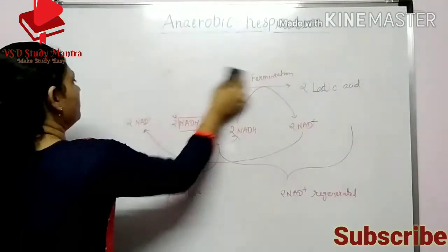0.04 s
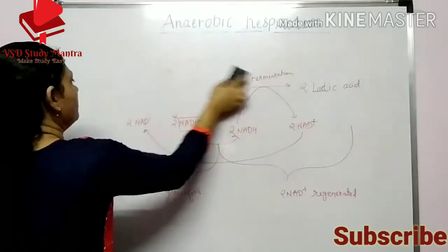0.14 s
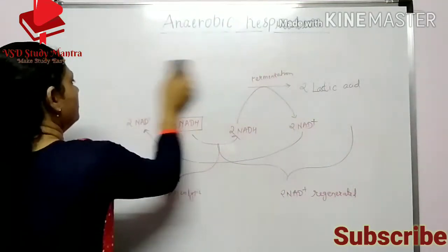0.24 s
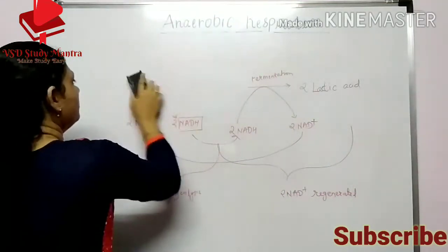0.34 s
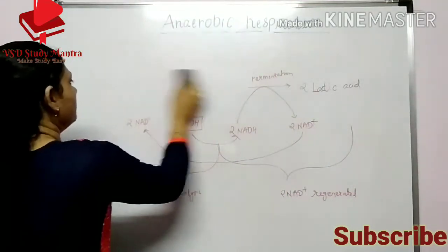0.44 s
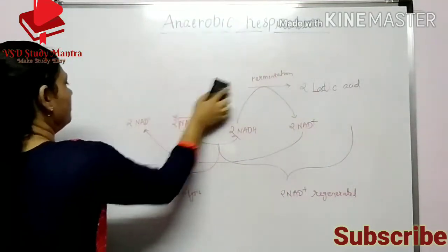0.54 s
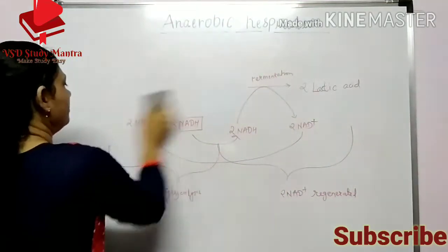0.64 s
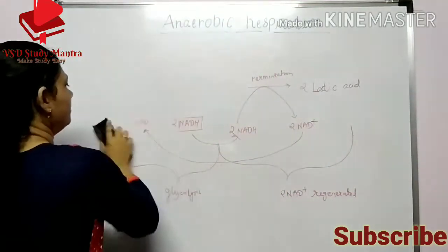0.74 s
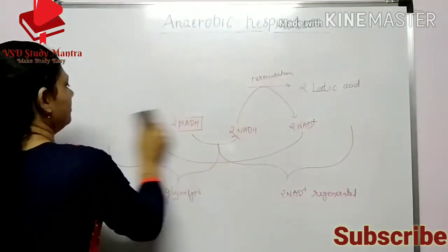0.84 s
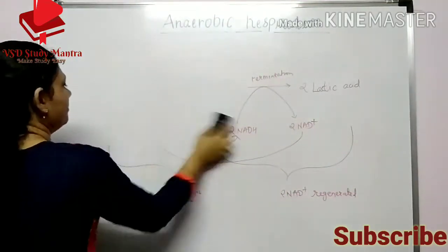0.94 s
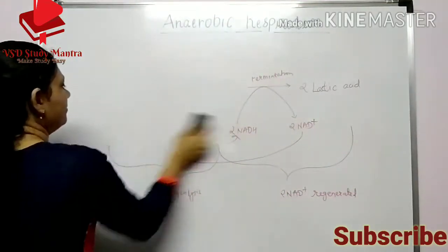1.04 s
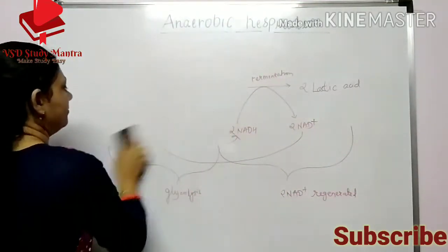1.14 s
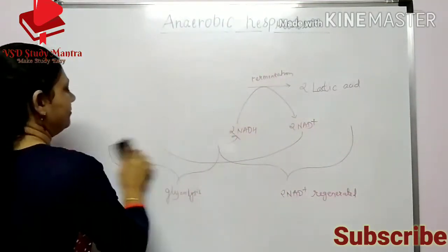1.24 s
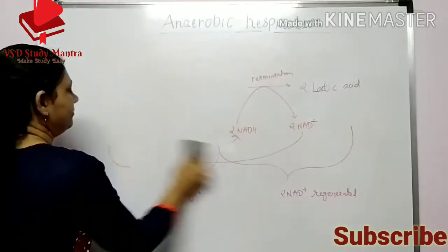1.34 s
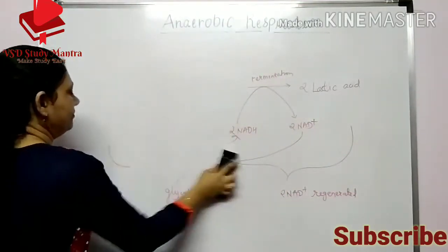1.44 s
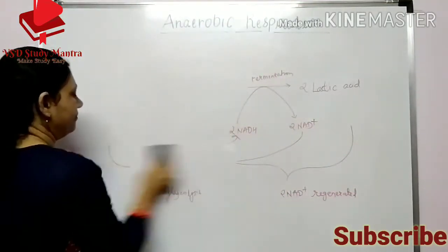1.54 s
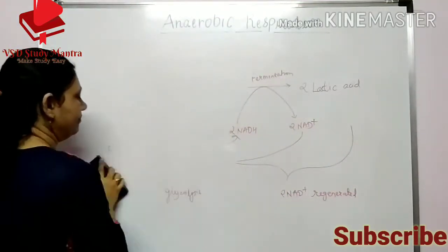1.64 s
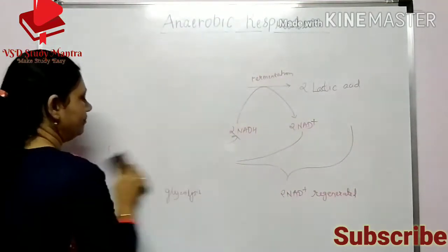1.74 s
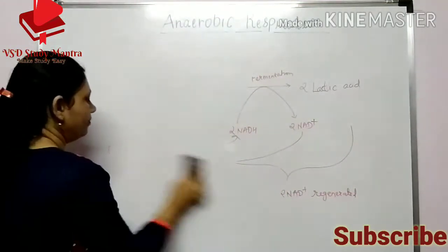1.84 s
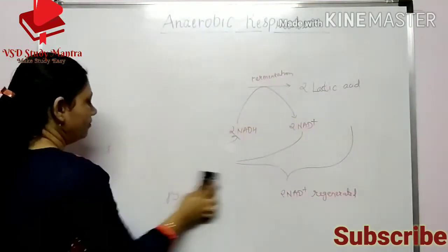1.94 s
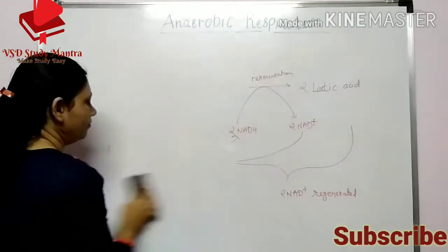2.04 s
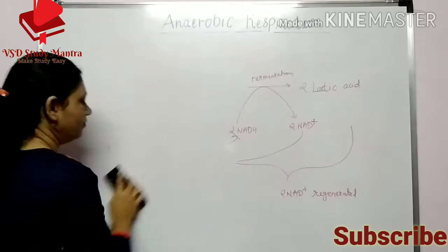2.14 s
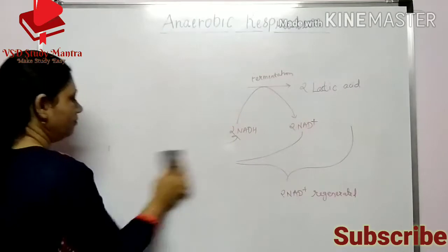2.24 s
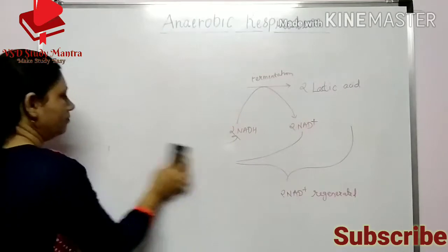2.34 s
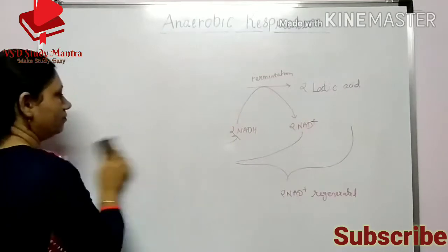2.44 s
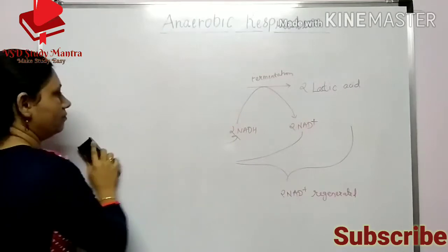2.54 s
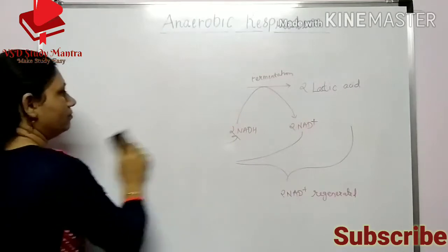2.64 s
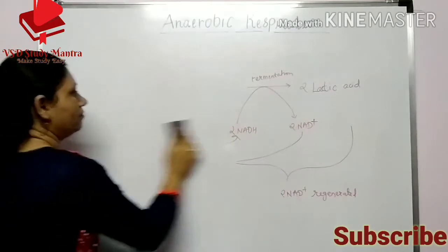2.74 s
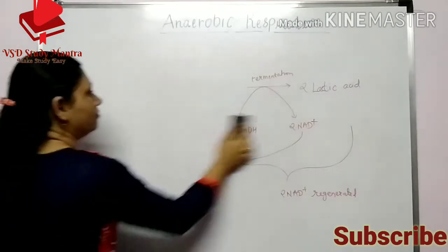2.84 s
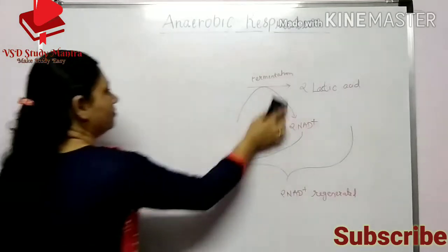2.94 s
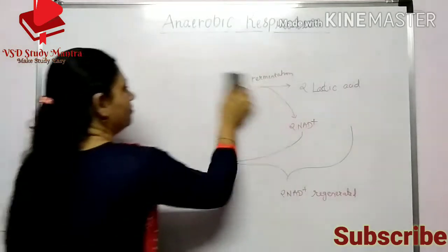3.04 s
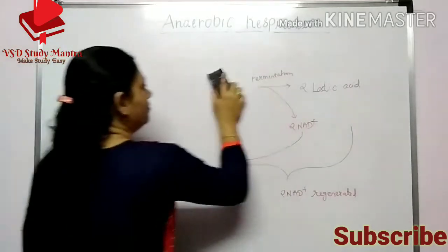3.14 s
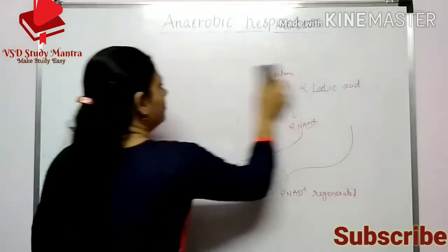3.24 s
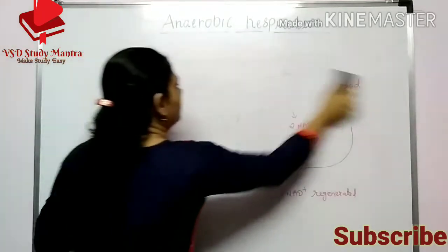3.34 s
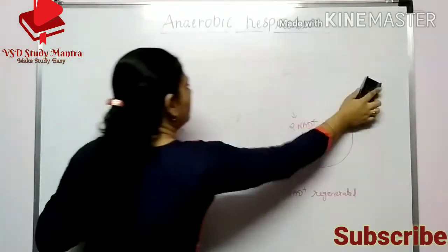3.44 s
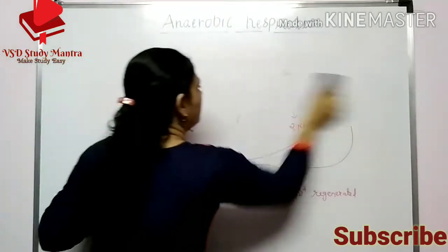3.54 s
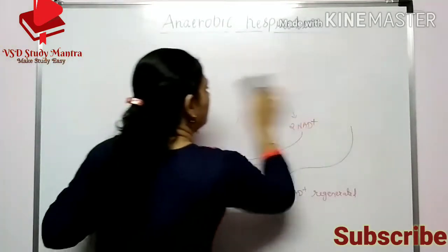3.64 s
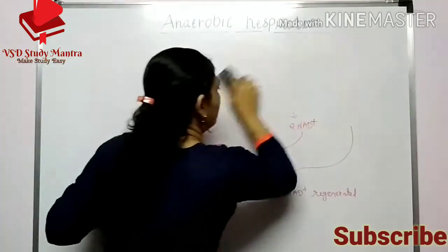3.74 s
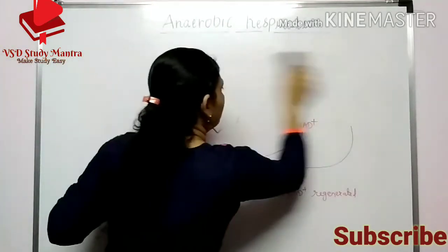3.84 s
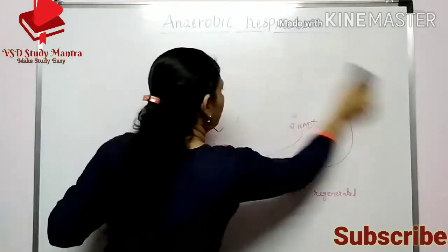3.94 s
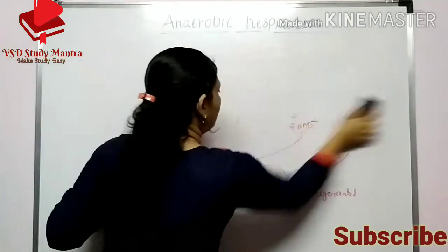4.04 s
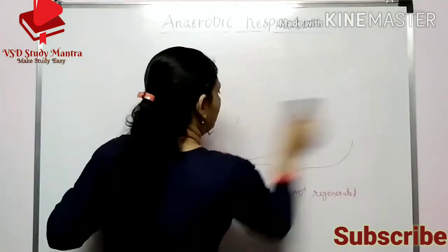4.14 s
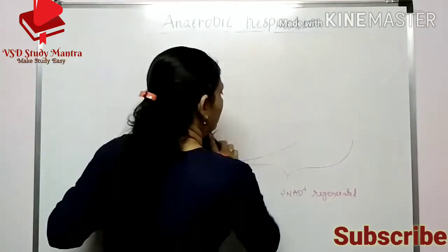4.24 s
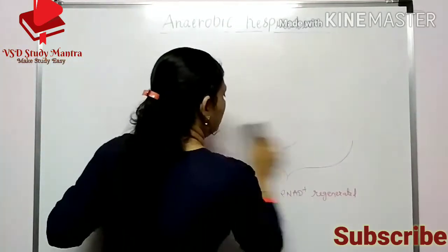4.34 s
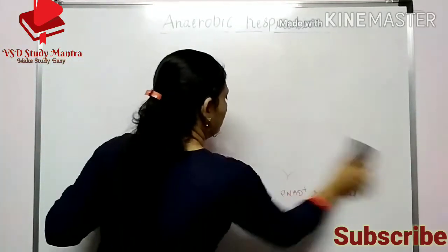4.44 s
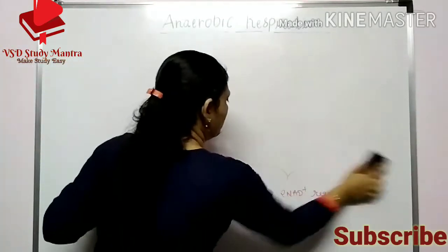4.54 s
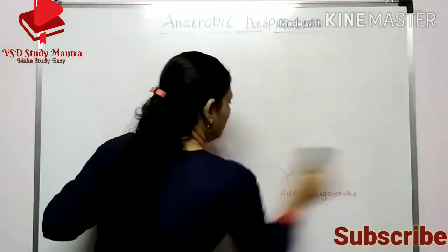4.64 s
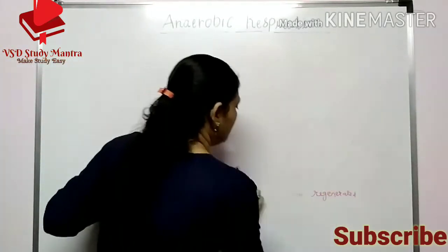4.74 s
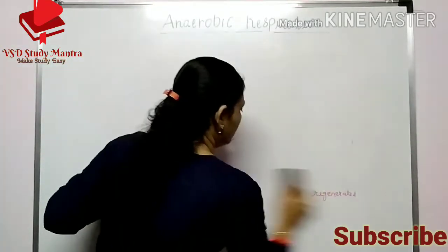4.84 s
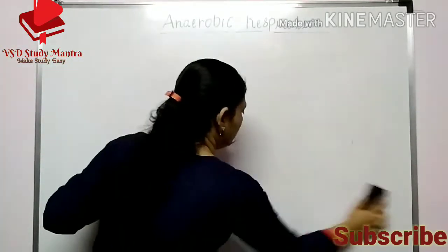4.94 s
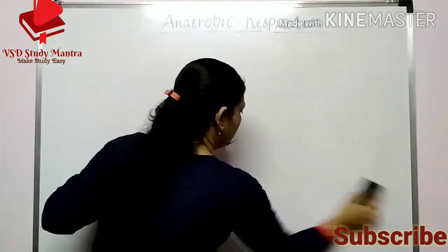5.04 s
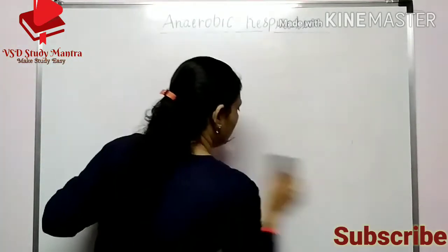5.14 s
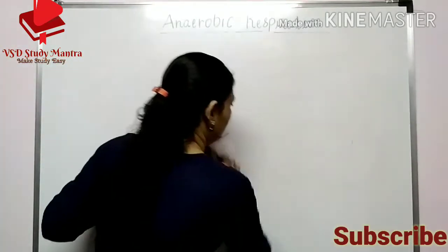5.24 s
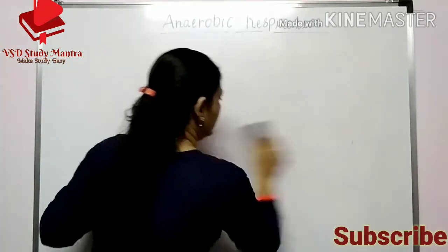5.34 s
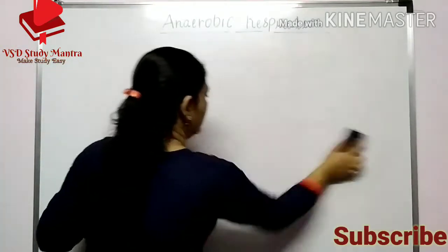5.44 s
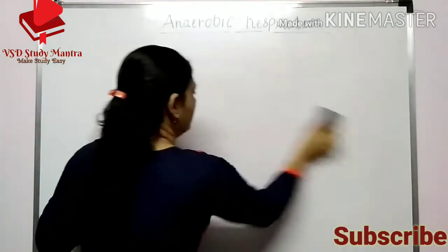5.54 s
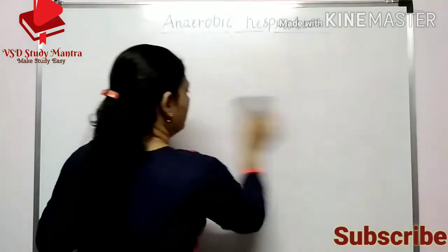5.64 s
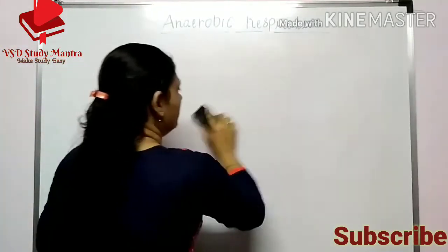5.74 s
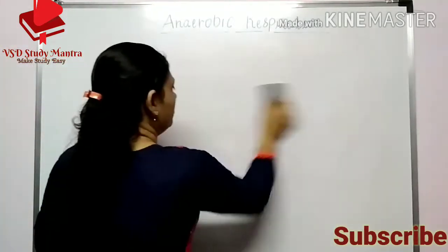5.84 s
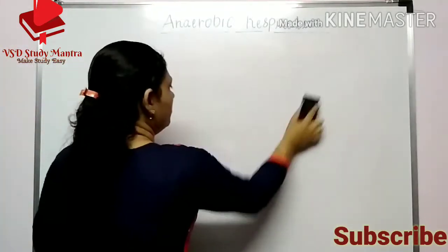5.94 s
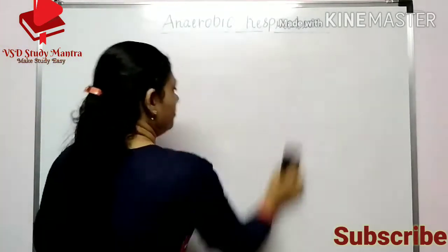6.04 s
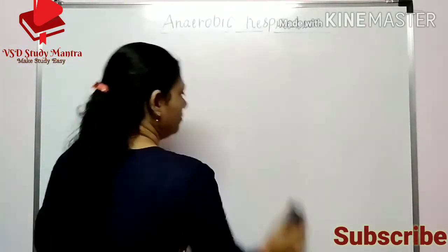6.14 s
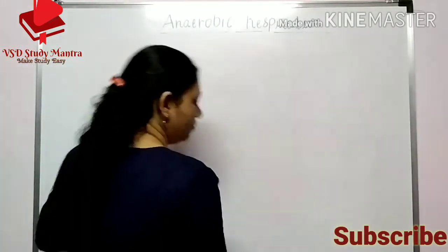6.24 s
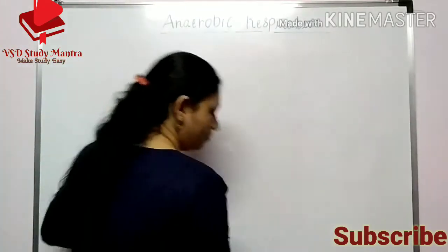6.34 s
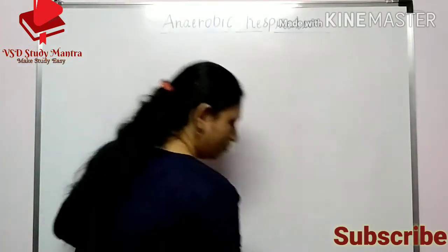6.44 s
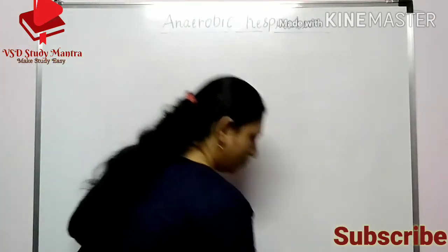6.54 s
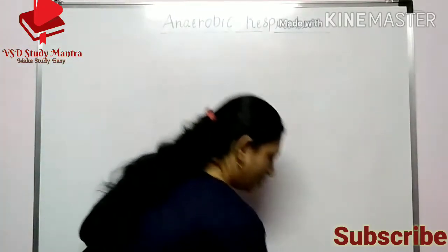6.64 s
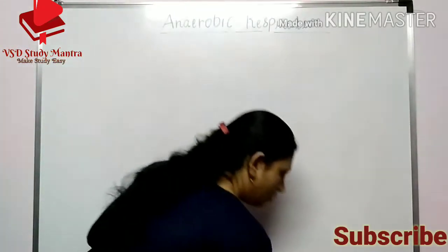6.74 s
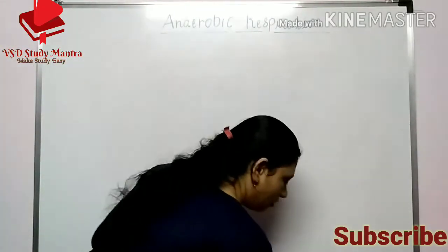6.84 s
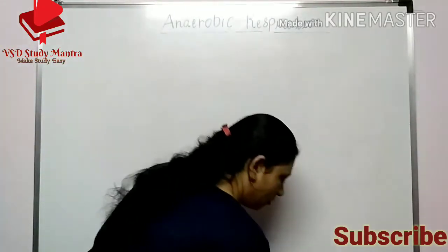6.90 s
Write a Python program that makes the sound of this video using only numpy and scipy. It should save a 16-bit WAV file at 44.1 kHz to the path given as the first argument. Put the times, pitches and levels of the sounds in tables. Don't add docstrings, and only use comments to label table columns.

```python
import sys
import numpy as np
from scipy import signal
from scipy.fft import rfft, irfft
from scipy.io import wavfile
from scipy.ndimage import uniform_filter1d, minimum_filter1d

SR = 44100
rng = np.random.default_rng(int(sys.argv[2]) if len(sys.argv) > 2 else 0)


def log_audio(samples):
    frames = np.atleast_2d(samples).T
    limited = np.clip(frames, -1, 1)
    pcm = np.round(limited * 32767).astype(np.int16)
    wavfile.write(sys.argv[1], SR, pcm)


def ratio_of_db(decibels):
    return 10 ** (np.asarray(decibels, float) / 20)


N = 307377
TIME = np.arange(N) / SR

# (frequency [Hz], width [Hz], level [dB])
BOARD = [(540, 26, -3.5), (698, 77, -2.5), (802, 90, -5), (1283, 79, -5.5), (740, 63, -25)]
# (start [s], length [s], pitch [Hz], deep flexing [dB], thrum [dB])
BENDS = [(0.0, 0.14, 263, -77, -75.5), (.17, 0.046, 337, -77.5, -87), (0.286, 0.12, 253, -74, -77.5),
         (0.593, 0.09, 230, -69, -67.5), (0.775, 0.064, 383, -54, -66), (0.844, 0.096, 322, -57, -61),
         (.95, .02, 340, -68.5, -72), (1.005, 0.078, 320, -62.5, -59.5), (1.26, 0.065, 275, -74, -73),
         (1.506, 0.183, 238, -72.5, -81.5), (1.768, 0.08, 267, -62.5, -83), (1.946, .06, 300, -73, -76),
         (2.052, 0.068, 250, -74, -72), (2.224, 0.082, 325, -76, -86), (2.4, 0.11, 317, -70.5, -92),
         (2.617, 0.036, 343, -76, -98), (2.858, 0.068, 254, -68, -70.5), (3.388, .02, 300, -84, -78),
         (3.45, 0.044, 320, -64, -77.5), (3.623, 0.125, 370, -74.5, -114), (4.116, 0.036, 280, -68, -78),
         (4.26, 0.065, 340, -71.5, -97), (4.384, 0.061, 385, -65.5, -91), (4.597, 0.052, 242, -66, -65),
         (4.867, 0.095, 278, -68, -69), (5.027, 0.084, 238, -91, -69), (5.308, 0.07, 250, -84, -76.5),
         (5.415, 0.15, 340, -70.5, -72), (5.833, 0.069, 352, -65.5, -71)]
# (start [s], length [s], pitch [Hz], flexing [dB], thrum [dB])
LAST_BENDS = [
    (6.003, 0.11, 235, -98, -76.5),
    (6.125, 0.038, 302, -76, -78.5),
]
LIFT_S, LIFT_FADE_DB_PER_S = 6.28, 175


def evened(x):
    return x / np.sqrt(np.mean(x ** 2) + 1e-20)


def read(points, hz):
    f, value = np.transpose(points)
    return np.interp(np.log(hz + 1), np.log(f + 1), value)


def curves(rows):
    s, *columns = np.transpose(rows)
    return [np.interp(TIME, s, column) for column in columns]


def add(mix, s, sound):
    part = mix[:, round(s * SR):][:, :sound.shape[1]]
    part += sound[:, :part.shape[1]]


def peaks(modes, hz):
    power = sum(ratio_of_db(db) ** 2 / (1 + (2 * (hz - f) / width) ** 2) ** 2 for f, width, db in modes)
    return 10 * np.log10(power)


def flutter(hz):
    return evened(signal.lfilter(*signal.butter(2, hz, fs=SR), rng.standard_normal(N)))


def noise(db_of_hz, patchy_db, size=1024):
    # (frequency [Hz], left-right likeness [-1..1])
    likeness = [(60, 1), (180, 0.79), (550, 0.29), (1650, 0.083), (4970, -0.031), (15000, 0.0023)]
    frames, hz = 4 * N // size + 5, np.fft.rfftfreq(size, 1 / SR)
    a, b, c, d, patches = rng.standard_normal((frames, len(hz), 5)).T
    patches = uniform_filter1d(patches, size=size // 100, axis=0)
    patches = evened(uniform_filter1d(patches, size=8, axis=1))
    same = np.clip(read(likeness, hz), -1, 1)[:, None]
    left = a + 1j * b
    right = same * left + np.sqrt(1 - same ** 2) * (c + 1j * d)
    z = np.array([left, right]) * ratio_of_db(db_of_hz(hz)[:, None] + patchy_db * patches)
    return evened(signal.istft(z, nperseg=size, noverlap=3 * size // 4)[1][:, :N])


def resonate(x, hz, width_hz):
    turn = np.exp(2j * np.pi * np.cumsum(hz) / SR)
    r = np.exp(-np.pi * width_hz / SR)
    once = signal.lfilter([1 - r], [1, -r], x / turn)
    twice = signal.lfilter([1 - r], [1, -r], once)
    return evened((turn * twice).real)


def swells(start, length, db, rise_db, sag_db, fall_db):
    t = TIME[None] - start[:, None]
    held = np.clip(t, 0, length[:, None])
    return ratio_of_db(db[:, None] + rise_db * np.minimum(t, 0) - sag_db * held - fall_db * np.maximum(t - held, 0))


def room_floor():
    # (frequency [Hz], level [dB per Hz])
    floor_colour = [(8, 8.5), (20, -8), (40, -24), (70, -36), (140, -0.5), (300, -10), (900, -15.5),
                    (3000, -23.5), (7000, -20.5), (12400, -17.5), (13000, -26), (15000, -54)]
    return ratio_of_db(-85.5 - 2.5) * noise(lambda hz: read(floor_colour, hz), 0.38, size=4096)


def far_motor():
    # (time [s], level [dB])
    drone_level = [(0, -73), (.4, -72.5), (1, -78.5), (1.25, -74.5), (1.5, -69), (1.64, -72), (1.78, -74.5),
                   (2.08, -81), (2.4, -100), (6.97, -112)]
    # (frequency [Hz], width [Hz], level [dB])
    drone_peaks = [(124, 59, 2), (50, 53, -28)]
    fuzz = noise(lambda hz: peaks(drone_peaks, hz), 1.8, size=8192)
    turns = np.cumsum(120 + 2.52 * flutter(4)) / SR
    tone = np.sqrt(2) * np.sin(2 * np.pi * turns) * ratio_of_db(2.0 * flutter(4))
    return (0.73 * fuzz + 0.65 * tone) * ratio_of_db(curves(drone_level)[0])


def thud():
    # (time [s], level [dB], pitch [Hz])
    push_path = [
        (6.93, -98, 129.7),
        (6.945, -64.5, 123),
        (6.957, -66, 150),
        (6.963, -53.5, 269),
        (6.97, -48, 227),
    ]
    edge_colour = [(800, -12), (2500, 1.0), (3800, -4), (5000, -15.0), (12000, -2.5), (16000, -26)]
    db, pitch_hz = curves(push_path)
    angle = 2 * np.pi * (np.cumsum(pitch_hz) / SR + np.array([[0.], [.06]]))
    push = np.sin(angle) + 0.24 * np.sin(2 * angle) + 0.13 * np.sin(3 * angle)
    edge = noise(lambda hz: read(edge_colour, hz), 2.5, size=256)
    return ratio_of_db(db) * (TIME > push_path[0][0]) * (evened(push) + 0.33 * edge)


def clink():
    # (frequency [Hz], width [Hz], level [dB])
    metal_modes = [(7700, 170, -4.5), (8800, 120, 0), (9250, 100, -2.5), (10400, 160, -8.5),
                   (11000, 760, -0.5), (12200, 190, -0.5), (13600, 160, -13), (14300, 400, -10.5)]
    # (time [s], level [dB], rustle minus ring [dB])
    clink_level = [
        (6.44, -106, -5),
        (6.495, -98, 20.5),
        (6.525, -68.5, -1),
        (6.57, -73, 0.5),
        (6.62, -80, -13),
        (6.7, -83.5, -1),
        (6.78, -100, -16),
        (6.9, -115, 5),
    ]
    # (time [s], level [dB], pitch [Hz])
    chime_path = [
        (6.49, -110, 3880),
        (6.52, -101, 3800),
        (6.565, -76, 3840),
        (6.6, -89, 3810),
        (6.655, -82, 3850),
        (6.72, -96, 3850),
        (6.76, -100, 3800),
        (6.8, -101, 3820),
        (6.83, -130, 3930),
    ]
    rustle_modes = [(10900, 7900, -3.5), (1980, 110, -10), (2400, 90, -2), (2850, 200, -3), (3300, 110, -4.5)]
    db, rustle_db = curves(clink_level)
    ring = noise(lambda hz: peaks(metal_modes, hz), 1.2)
    rustle = noise(lambda hz: peaks(rustle_modes, hz), 3.2)
    chime_db, chime_hz = curves(chime_path)
    turns = np.cumsum(chime_hz + 40 * flutter(140)) / SR + np.array([[0.], [.25]])
    chime = ratio_of_db(chime_db + 3.1 * flutter(40)) * np.sqrt(2) * np.sin(2 * np.pi * turns)
    rubbed = ratio_of_db(db + 0.5) * (ring + ratio_of_db(rustle_db) * rustle)
    return (TIME > clink_level[0][0]) * (rubbed + chime)


def settle_and_squeak():
    # (start [s], length [s], pitch [Hz], level [dB])
    settling = [(6.377, 0.016, 557, -79), (6.418, 0.016, 540, -82), (6.383, 0.022, 748, -85.5),
                (6.41, 0.044, 691, -80.5), (6.468, 0.027, 725, -82), (6.53, .025, 698, -92),
                (6.535, 0.031, 164, -76.5), (6.595, 0.014, 152, -86), (6.628, .04, 167, -92),
                (6.693, 0.038, 353, -83.5), (6.768, 0.021, 366, -90), (6.846, 0.016, 730, -95),
                (6.956, .03, 547, -73)]
    # (start [s], length [s], pitch [Hz], level [dB])
    squeaks = [
        (3.19, .065, 1160, -70),
        (3.045, .035, 700, -67),
        (5.74, .025, 700, -63),
        (3.69, .05, 700, -64),
        (4.2, .05, 1150, -74),
        (3.915, .12, 535, -71),
        (5.655, .02, 560, -69),
        (.35, .04, 1310, -75),
    ]
    start, length, pitch_hz, db = np.transpose(settling + squeaks)
    gain = swells(start, length, db, rise_db=1200, sag_db=30, fall_db=600)
    turns = np.cumsum([hz + 22 * flutter(110) for hz in pitch_hz], axis=1) / SR
    sides = []
    for lead in (0, .08):
        tones = (gain * np.sin(2 * np.pi * (turns + lead))).sum(0)
        sides.append(tones * ratio_of_db(4.2 * flutter(40)))
    return np.array(sides) * np.sqrt(2)


def knocks():
    # (time [s], peak level [dB], pitch [Hz], hard edge minus ring [dB])
    blows = [(0.029, -54, 514, -10), (0.507, -55, 711, -8), (0.753, -53, 476, -13), (0.911, -51, 630, -16),
             (0.93, -45, 720, -14), (0.951, -57, 1400, -4), (0.99, -38, 640, -6), (1.019, -47, 807, -14),
             (1.043, -52, 790, -14), (1.14, -52, 657, -14), (1.464, -55, 533, -12), (1.468, -55, 780, -14),
             (1.75, -60, 476, -10), (2.62, -62, 850, -5), (2.818, -57, 845, -8), (2.837, -50, 541, -9),
             (2.937, -52, 525, -12), (3.032, -46, 720, -18), (3.127, -58, 807, -12), (3.37, -59, 568, -12),
             (3.449, -46, 541, -25), (3.543, -53, 525, -18), (3.62, -51, 541, -12), (3.676, -46, 538, -9),
             (3.709, -50, 700, -12), (3.989, -55, 571, -11), (4.083, -60, 668, 0), (4.243, -54, 533, -6),
             (4.509, -54, 554, -12), (4.572, -56, 670, -4), (4.635, -53, 554, -14), (4.887, -56, 530, -12),
             (4.933, -52, 522, -14), (4.991, -48, 541, -15), (5.181, -59, 711, -14), (5.384, -53, 528, -15),
             (5.487, -51, 530, -13), (5.602, -57, 756, -12), (5.71, -41, 800, -12), (5.739, -50, 697, -12),
             (5.831, -52, 600, -14), (5.845, -49, 514, -18), (5.875, -51, 530, -16), (6.115, -62, 1130, -8)]
    out, t = np.zeros((2, N)), np.arange(6000) / SR
    for s, db, pitch_hz, edge_db in blows:
        detune = rng.uniform(.985, 1.015, 5)
        ring = 0
        for (f, width, mode_db), k in zip(BOARD, detune):
            off_pitch_db = 5.0 * abs(np.log2(f / pitch_hz))
            ring = ring + ratio_of_db(mode_db - off_pitch_db - 60 * t * width / 5.1) * np.sin(2 * np.pi * f * k * t)
        blow = ratio_of_db(-60 * t / .03) * np.sin(2 * np.pi * pitch_hz * t)
        edge = sum(np.sin(2 * np.pi * f * detune[0] * t) for f in (880, 1150, 1390, 1620))
        edge = edge * ratio_of_db(edge_db - 60 * t / .04)
        direct = (ring + 2.2 * blow + 1.5 * edge) * np.minimum(t / .001, 1)
        scatter = rng.standard_normal((2, 6000)) * ratio_of_db(-60 * t / 0.22) * np.minimum(t / 0.0014, 1)
        scatter /= np.linalg.norm(scatter[0])
        tail = signal.fftconvolve(direct[None], scatter, axes=1)[:, :6000]
        tail *= .33 * np.cos(np.pi / 2 * t / t[-1])
        add(out, s - .001, ratio_of_db(db + 1.5) / abs(direct).max() * (direct + tail))
    return signal.sosfilt(signal.butter(2, 400, "high", fs=SR, output="sos"), out)


def rattle(column):
    # (start [s], length [s], lowest mode [dB], upper modes [dB])
    rattles = [(0.0, 0.03, -92, -68), (0.042, 0.1, -74, -78.5), (0.17, 0.28, -88, -85.5),
               (0.523, 0.018, -66.5, -76), (0.734, 0.077, -71.5, -76), (0.817, .08, -69.5, -73),
               (0.91, 0.031, -74, -66), (0.99, 0.046, -66, -58.5), (1.137, 0.054, -72, -67.5),
               (1.262, 0.34, -77.5, -76), (1.752, 0.072, -77, -81), (1.943, 0.075, -80, -79.5),
               (2.199, 0.22, -100, -82.5), (2.48, 0.07, -85, -83.5), (2.617, 0.037, -99, -75.5),
               (2.834, .14, -77, -70), (2.946, 0.048, -68, -71), (3.033, 0.074, -70.5, -67),
               (3.192, 0.15, -79, -82), (3.366, 0.083, -76, -73.5), (3.447, 0.03, -56, -68.5),
               (3.55, 0.042, -66.5, -69.5), (3.603, 0.067, -80, -68), (3.67, 0.049, -68, -62),
               (3.79, 0.014, -84, -72.5), (3.934, 0.17, -72, -73), (4.071, 0.11, -78, -67.5),
               (4.231, 0.067, -70.5, -68.5), (4.338, 0.11, -80.5, -78.5), (4.484, 0.26, -67, -65.5),
               (4.67, 0.12, -83, -70.5), (4.899, 0.12, -67.5, -73), (4.992, 0.031, -64, -66.5),
               (5.046, 0.057, -70, -73), (5.133, 0.15, -74.5, -76), (5.267, 0.08, -82, -93),
               (5.383, 0.023, -66.5, -72), (5.457, .03, -60.5, -82), (5.485, 0.039, -66, -65),
               (5.576, 0.13, -71.5, -69), (5.708, 0.016, -61.5, -64), (5.735, .025, -75, -59),
               (5.799, 0.19, -68.5, -66.5), (5.985, 0.23, -77.5, -82)]
    start, length, *db = np.transpose(rattles)
    return swells(start, length, db[column], rise_db=1600, sag_db=40, fall_db=200).max(0)


def sheet_shudder():
    low = noise(lambda hz: peaks(BOARD[:1] + [(557, 94, -11)], hz), 2.0)
    upper = noise(lambda hz: peaks(BOARD[1:3] + [(724, 260, -12)], hz), 2.5)
    chatter = low * rattle(column=0) * ratio_of_db(2.5) + upper * rattle(column=1) * ratio_of_db(3.5)
    return chatter * ratio_of_db(1.2 * flutter(20))


def sheet_bending():
    # (frequency [Hz], level [dB per Hz])
    flex_colour = [(150, -33), (210, -3.5), (300, -1.5), (400, -2), (480, -23.5)]
    # (frequency [Hz], level [dB per Hz])
    thrum_colour = [(25, -32), (78, -26), (105, -11), (125, -2), (160, -1), (200, 2), (260, -70)]
    start, length, pitch_hz, flex_db, thrum_db = np.transpose(BENDS + LAST_BENDS)
    shape = 366, 11, 137
    bends = swells(start, length, flex_db, *shape)
    flex_hz = uniform_filter1d(pitch_hz[bends.argmax(0)], size=1000)
    flex = noise(lambda hz: read(flex_colour, hz), 3.35, size=2048)
    flex = (resonate(flex, flex_hz, 200) + 1.2 * flex) * ratio_of_db(-7.0) * bends.max(0)
    thrum = noise(lambda hz: read(thrum_colour, hz), 2.3, size=4096)
    return flex + thrum * swells(start, length, thrum_db, *shape).max(0)


def hand_speed_db():
    # (turn of the hand [s], hiss at the turn [dB], time to full speed [s], hiss at full speed [dB])
    sweeps = [(0.0, -43.5, 0.04, -40), (0.211, -47.5, 0.2, -44.5), (0.449, -51.5, 0.084, -41),
              (0.649, -46.5, 0.079, -44.5), (0.858, -56, 0.14, -41.5), (1.102, -44.5, 0.1, -44.5),
              (1.313, -55.5, 0.16, -41), (1.586, -47.5, 0.072, -44), (1.791, -56.5, 0.16, -40.5),
              (2.055, -47.5, 0.052, -43.5), (2.23, -54.5, 0.14, -41.5), (2.429, -46.5, 0.11, -46),
              (2.686, -55.5, 0.15, -42.5), (2.775, -46.5, 0.087, -39.5), (2.925, -44.5, .02, -44),
              (3.063, -46.5, 0.12, -45), (3.228, -50.5, 0.11, -41.5), (3.569, -55.5, 0.22, -42.5),
              (3.826, -48, 0.1, -42.5), (4.161, -52.5, 0.17, -44.5), (4.375, -49, 0.1, -42),
              (4.649, -52, 0.14, -44.5), (4.864, -46.5, 0.096, -42.5), (5.118, -52.0, 0.17, -44),
              (5.363, -48, 0.11, -41.5), (5.602, -55, 0.14, -43.5), (5.827, -45.5, 0.12, -41.8),
              (6.041, -49, 0.077, -45)]
    turn, turn_db, rise, top_db = np.transpose(sweeps)
    ends, ends_db = np.append(turn, LIFT_S), np.append(turn_db, -62.5)
    k = np.clip(np.searchsorted(ends, TIME, "right") - 1, 0, len(turn) - 1)
    top = turn[k] + rise[k]
    speeding_up = TIME < top
    up, down = (TIME - ends[k]) / rise[k], (ends[k + 1] - TIME) / (ends[k + 1] - top)
    dome = np.sin(np.pi / 2 * np.clip(np.where(speeding_up, up, down), 0, 1))
    low_db = np.where(speeding_up, ends_db[k], ends_db[k + 1])
    return low_db + (top_db[k] - low_db) * dome - LIFT_FADE_DB_PER_S * np.maximum(TIME - LIFT_S, 0)


def uneven_grip():
    catches = ratio_of_db(2.3 * rng.exponential(1, N)) * (rng.random(N) < 25 / SR)
    catches = signal.lfilter([1], [1, -np.exp(-1 / (0.0087 * SR))], catches)
    grip = ratio_of_db(0.45 * flutter(22) + 0.19 * flutter(380)) * (1 + 0.0084 * catches)
    return grip / np.sqrt(uniform_filter1d(grip ** 2, size=6000))


def eraser():
    # (frequency [Hz], level [dB per Hz])
    fibre_colour = [(2060, -73), (3500, -20.5), (4290, -14), (5600, -11.5), (9030, 0), (10800, 1.5),
                    (14900, -7.5), (15700, -9), (16000, -31.5)]
    # (frequency [Hz], level [dB per Hz])
    pad_colour = [(1050, -34.5), (1300, -15), (1500, -6), (1850, -3), (2100, -1.5), (2650, 0), (3300, -2.5),
                  (3700, -4), (4200, -3), (6000, -7.5), (7800, -8), (12000, -36)]
    # (frequency [Hz], width [Hz], level [dB])
    handle_modes = [(1131.3, 27.4, 12.5), (1090, 1020, 7)]
    # (time [s], handle level under the fingers [dB], pad follows hiss [0-1], pad pressure [dB])
    hold = [(0, -1, 0.02, 2), (.75, 2, 1, 0), (.86, 8, 0.6, -0.5), (1.05, 0.5, 1, 0), (1.65, -0.5, 0.25, 1),
            (1.85, 0, 0.6, 0), (2.0, -1.5, 0.6, 2), (2.28, -2, 0.6, 0), (2.5, 3, 0.9, 3.5),
            (3.0, -2, 0.77, -0.5), (3.7, -2, 0.32, 0.5), (4.5, -3, 0.31, -1), (5.3, -3.5, 0.43, -1),
            (6.2, -2.5, 0.86, -0.5)]
    handle_bass_cut = [(75, -21), (140, -8), (300, -8.0)]
    pad_db, pad_lag_s, handle_db = -55, 0.0019, -68.5
    hiss_db = hand_speed_db()
    faded_db = LIFT_FADE_DB_PER_S * np.maximum(TIME - LIFT_S, 0)
    stroke_db = hiss_db + faded_db + 44
    damp_db, follows, press_db = curves(hold)
    lagged_db = np.interp(TIME - pad_lag_s, TIME, stroke_db)
    chatter = rattle(column=1)
    hiss = noise(lambda hz: read(fibre_colour, hz), 0.21, size=512) * ratio_of_db(hiss_db)
    pad = noise(lambda hz: read(pad_colour, hz), 1.0, size=512)
    pad *= ratio_of_db(pad_db + press_db + follows * lagged_db - faded_db)
    pad *= 1 + ratio_of_db(1 - handle_db) * chatter / 10
    handle = noise(lambda hz: peaks(handle_modes, hz) + read(handle_bass_cut, hz), 1.57)
    handle *= ratio_of_db(handle_db + damp_db + 0.64 * stroke_db - faded_db) + ratio_of_db(-1.5) * chatter
    pan_db = (0.4 - 0.2 * TIME) * np.array([[.5], [-.5]])
    return uneven_grip() * ratio_of_db(pan_db) * (hiss + pad + handle)


def room(x):
    # (frequency [Hz], ripple [dB])
    echo_comb = [(800, 2.5), (2000, 4), (4000, 4.6), (7000, 3.8), (9000, 3), (12000, 3.6)]
    hz, _, z = signal.stft(x, SR, nperseg=2048, noverlap=1536)
    comb = uniform_filter1d(rng.standard_normal(z.shape), size=10, axis=2)
    comb = evened(uniform_filter1d(comb, size=2, axis=1))
    ripple_db = read(echo_comb, hz)[:, None]
    z = z * ratio_of_db(ripple_db * comb - ripple_db ** 2 * np.log(10) / 20)
    return evened(signal.istft(z, nperseg=2048, noverlap=1536)[1][:, :N]) * x.std()


def scene():
    background = room_floor() + far_motor()
    handling = thud() + clink() + settle_and_squeak()
    sheet = knocks() + sheet_shudder() + sheet_bending()
    return background + handling + sheet + room(eraser())


def suppress(x, share):
    # (frequency [Hz], depth [dB])
    holes = [(300, 4), (1300, 8), (2400, 0), (3350, 4), (3600, 34), (6500, 30), (8300, 8), (11500, 0),
             (15000, 18)]
    # (start [s], length [s], centre [Hz], width [Hz], depth [dB])
    bites = [(0.222, 0.28, 557, 220, 9), (0.437, 0.085, 380, 200, 8), (.86, 0.075, 1170, 200, 19),
             (1.62, .12, 533, 198, 3), (1.673, 0.14, 1070, 150, 23), (1.792, 0.14, 1210, 260, 10),
             (1.836, 0.099, 1040, 160, 26), (1.876, 0.074, 573, 120, 12), (1.948, 0.12, 880, 140, 15),
             (2.17, 0.31, 514, 160, 11), (2.216, 0.23, 1080, 184, 25), (2.28, 0.097, 880, 180, 26),
             (2.42, 0.078, 960, 160, 19), (2.614, 0.12, 623, 200, 17), (2.735, 0.096, 500, 1000, 7),
             (4.8, 0.42, 105, 60, 12), (5.8, .14, 75, 60, 11), (3.87, .08, 70, 60, 8),
             (1.38, 0.066, 890, 140, 16), (3.242, 0.062, 620, 150, 4), (3.26, 0.1, 940, 140, 13),
             (3.9, 0.098, 333, 140, 26), (3.91, 0.13, 1380, 100, 11), (4.407, 0.024, 597, 160, 5),
             (4.25, 0.34, 91.5, 70, 16), (5.214, 0.08, 332, 160, 12), (5.306, 0.057, 500, 200, 9),
             (5.636, 0.15, 336, 242, 10), (6.498, 0.21, 4940, 1690, 13), (6.493, .17, 8000, 400, 22),
             (6.484, .2, 13300, 400, 18), (6.377, 0.077, 14700, 3000, 17)]
    z = signal.stft(x, nperseg=1024, noverlap=768)[2]
    power = uniform_filter1d((abs(z) ** 2).mean(0), size=7, axis=1)
    power = uniform_filter1d(power, size=6, axis=0)
    under_db = 10 * np.log10(power / uniform_filter1d(power, size=120, axis=0) + 1e-20)
    shut = under_db < np.quantile(under_db, share, axis=1, keepdims=True)
    busy = minimum_filter1d(power.mean(0), size=9, origin=4) > power.mean() / 1500
    shut = uniform_filter1d(1. * shut * busy, size=2, axis=1)
    hz, t = np.fft.rfftfreq(1024, 1 / SR)[:, None], np.arange(z.shape[2]) * 256 / SR
    for start, length, centre_hz, width_hz, db in bites:
        active = np.clip(np.minimum(t - start, start + length - t) / 0.032 + .5, 0, 1)
        z = z * ratio_of_db(-db * active * np.exp(-(2 * (hz - centre_hz) / width_hz) ** 4))
    return signal.istft(z * ratio_of_db(-read(holes, hz) * shut), nperseg=1024, noverlap=768)[1][:, :N]


def top_cut(x):
    return signal.sosfilt(signal.butter(12, 16590, fs=SR, output="sos"), x)


def record(dry):
    # (frequency [Hz], left minus right [dB])
    tilt = [(60, 4), (130, -1.5), (290, -3), (640, -0.5), (1410, 0.5), (3100, -1), (6820, -1.5),
            (11000, 1.5), (15000, 8.5)]
    hz = np.fft.rfftfreq(N, 1 / SR)
    tilt_db = read(tilt, hz) * np.array([[.5], [-.5]])
    case_dip_db = -3 / (1 + (2 * (hz - 3615) / 200) ** 2)
    band_limit = np.sin(np.pi / 2 * np.clip((15560 - hz) / 120, 0, 1)) ** 2
    ports = irfft(rfft(dry) * ratio_of_db(tilt_db + case_dip_db) * band_limit, N)
    return top_cut(suppress(ports, share=.17))


dry = scene()
out = record(dry)
log_audio(out)
```